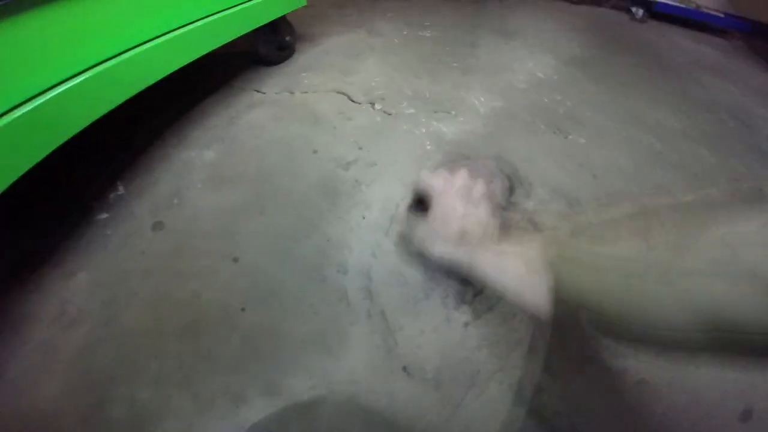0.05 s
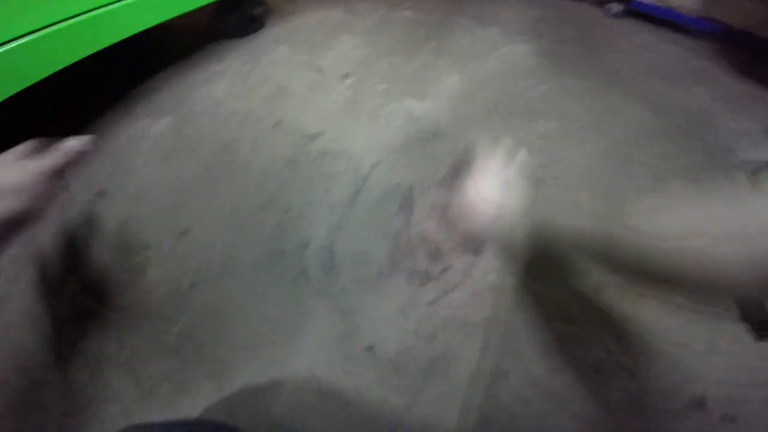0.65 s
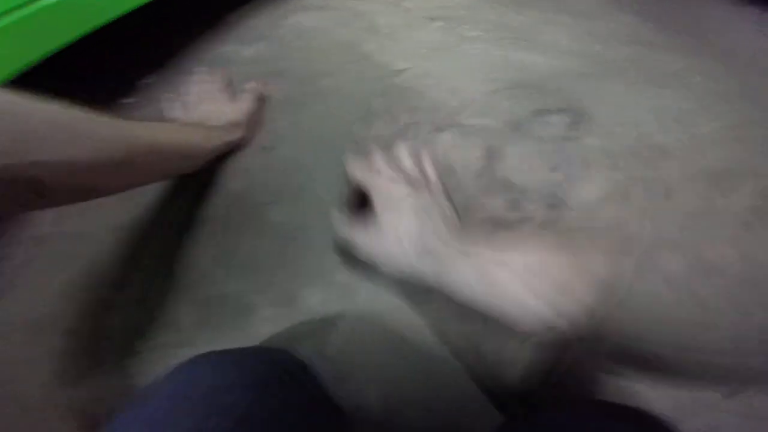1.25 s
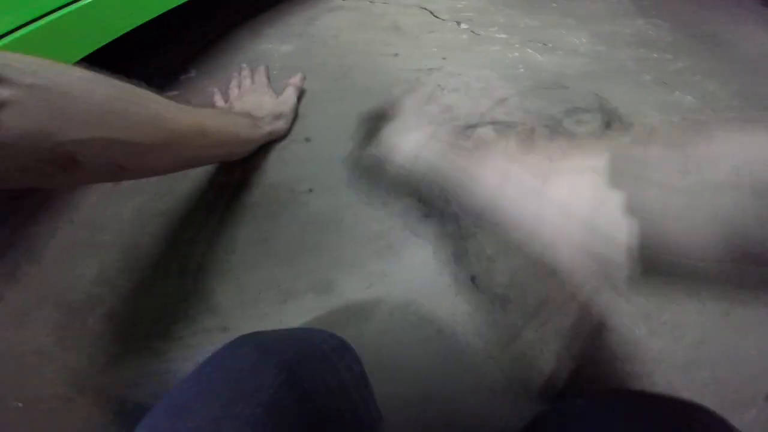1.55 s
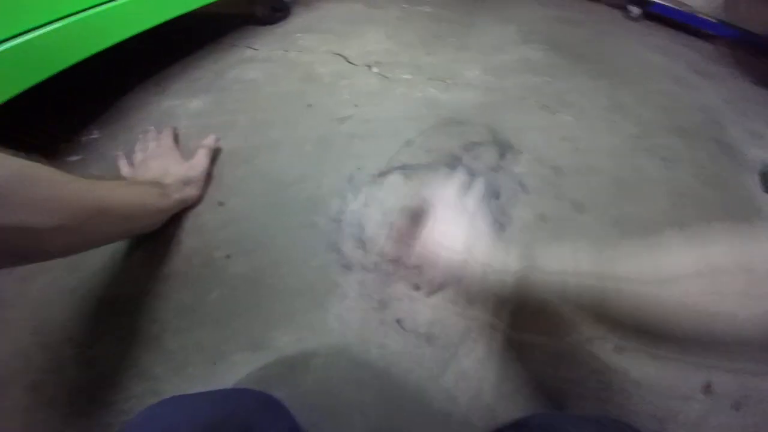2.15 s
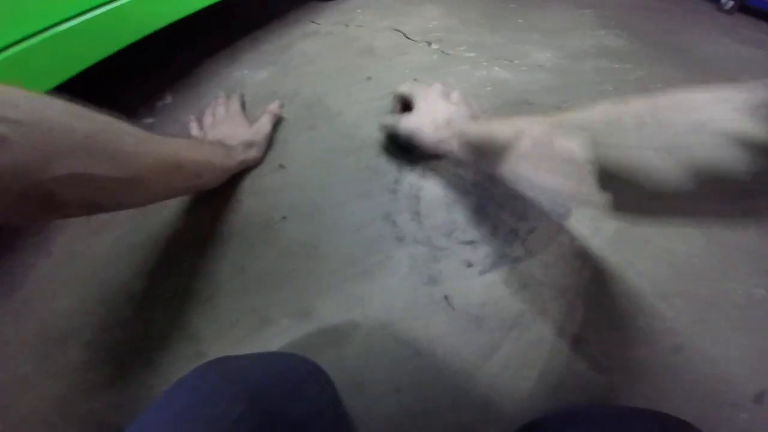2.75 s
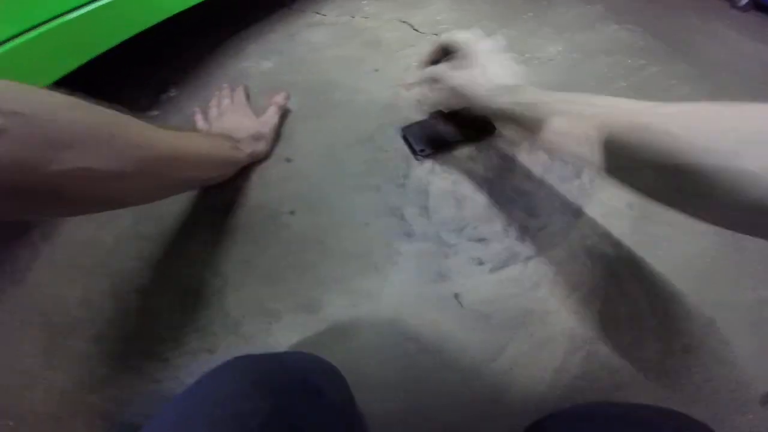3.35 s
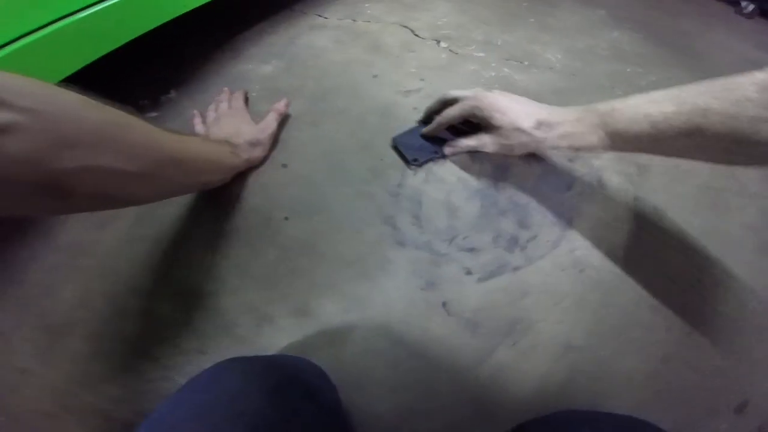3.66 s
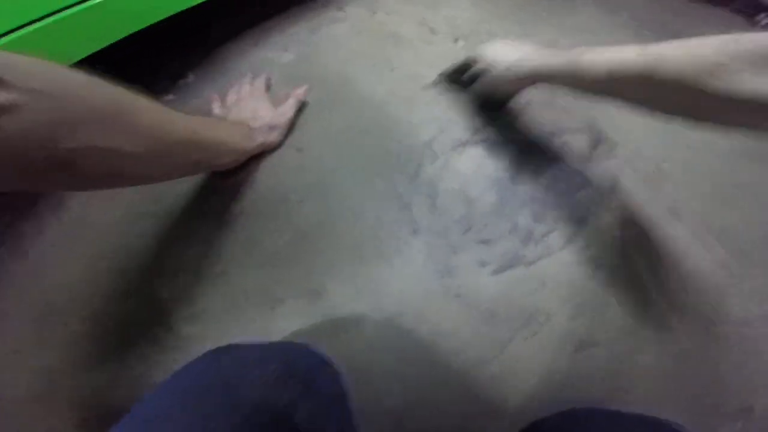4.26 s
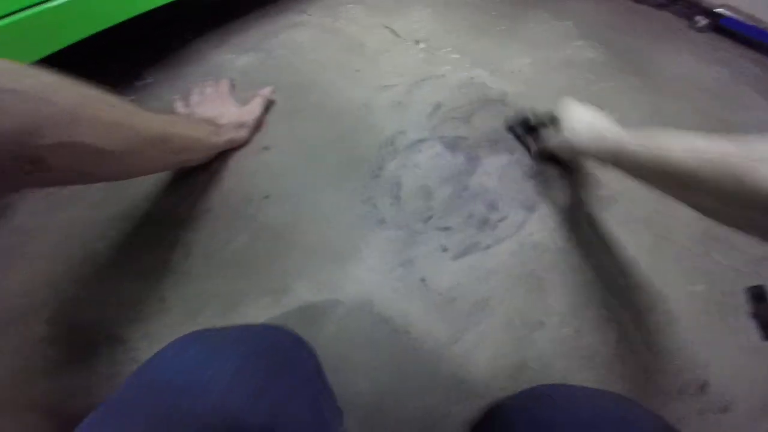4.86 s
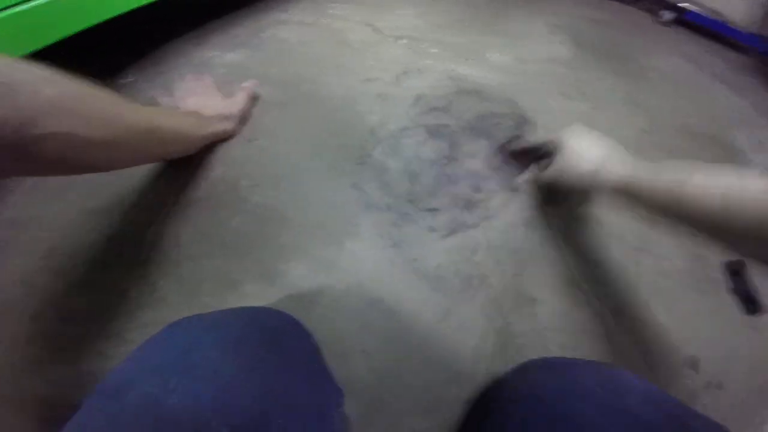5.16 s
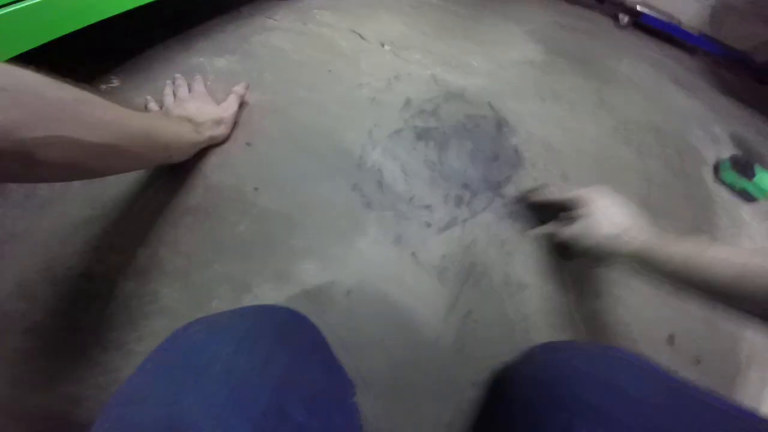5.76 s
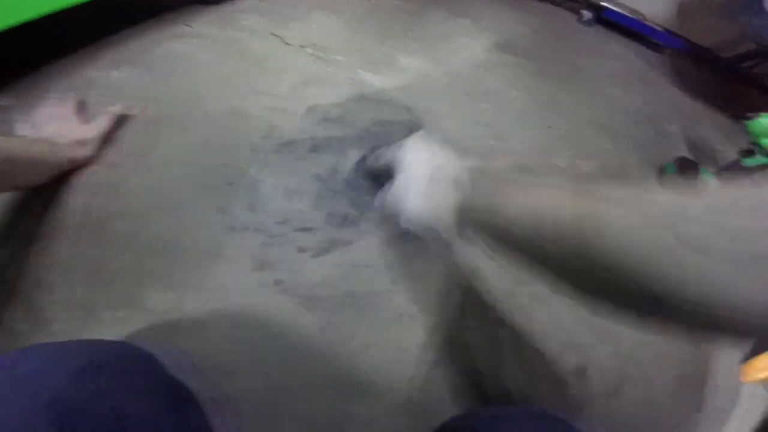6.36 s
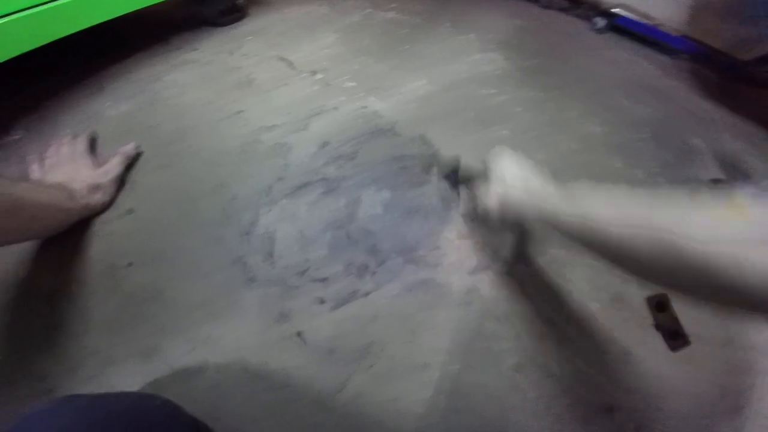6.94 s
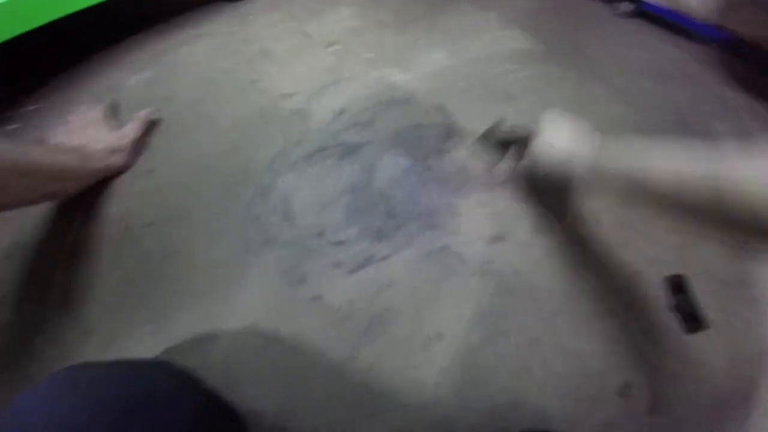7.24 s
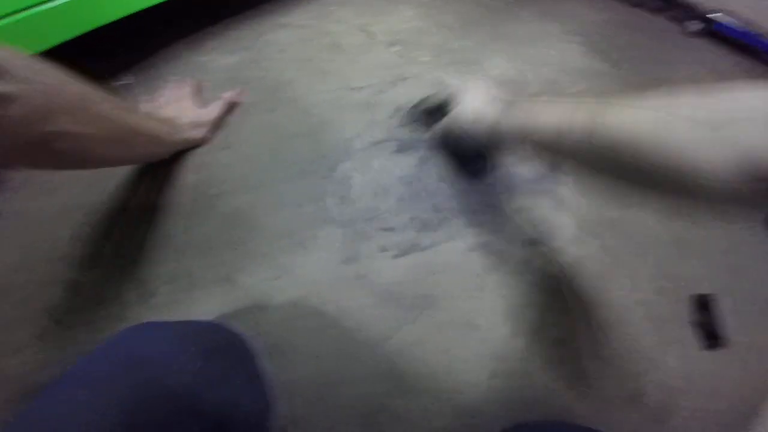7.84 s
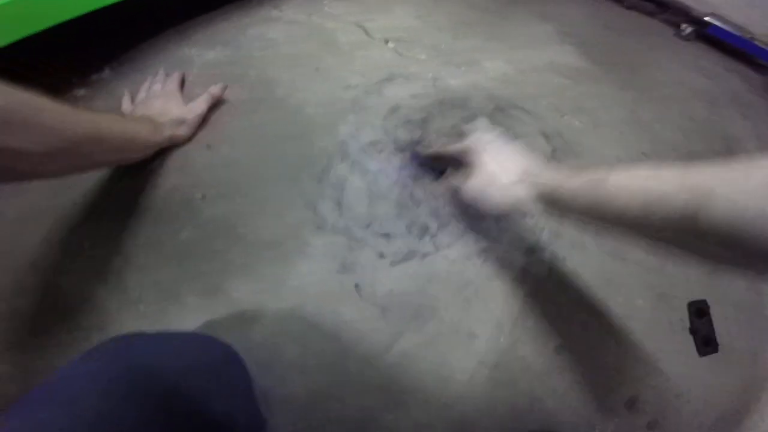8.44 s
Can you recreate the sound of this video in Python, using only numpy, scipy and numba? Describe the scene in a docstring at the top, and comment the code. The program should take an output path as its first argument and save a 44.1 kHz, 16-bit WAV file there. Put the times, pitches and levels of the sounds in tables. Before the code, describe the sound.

Three plastic clicks snap right at the microphone, the second very loud. A brake pad is then scrubbed in quick circles on a concrete garage floor, each stroke a gritty rasp with a short, rough metallic squeal. It stops with a light knock, is turned over, and starts again on its edge, brighter and squeakier. The sound is close, with a faint ring from the room.

```python
"""A brake pad scrubbed in circles on a concrete garage floor: on its face, then, turned over, on its edge.
With each push and pull of the arm, sand grains rasp under it and set its steel backing plate ringing in
short, rough squeals. The microphone sits in a worn camera whose plastic case clicks three times at the
start, right up close, ducking the gain control. The camera sways with the arm; the garage rings faintly."""
import sys
import numpy as np
from scipy import signal
from scipy.fft import rfft, irfft, next_fast_len
from scipy.io import wavfile
from scipy.ndimage import uniform_filter1d, minimum_filter1d, map_coordinates
from numba import njit

SR = 44100
rng = np.random.default_rng(int(sys.argv[2]) if len(sys.argv) > 2 else 0)


def transcribe(signal):
    """Save signal, clipped to [-1, 1], as a 16-bit WAV file at the path in sys.argv[1]."""
    frames = np.atleast_2d(signal).T
    limited = np.clip(frames, -1, 1)
    pcm = np.round(limited * 32767).astype(np.int16)
    wavfile.write(sys.argv[1], SR, pcm)


N = 383669

# bending modes of the steel plate: pitch_hz, width_hz, on_face_db, on_edge_db
BENDING_MODES = [(2460, 91, -1, 12), (2770, 57, -12, -35), (3223, 85, -12, 1)]


def scrape():
    """Grains strike the pad: a rasp, the squeal of the bending plate, a sizzle of high modes and dust."""
    # the grip shifts the first bending mode: time_s, pitch_hz
    grip = [(0.4, 2390), (0.68, 2540), (0.91, 2500), (1.85, 2514), (2.62, 2367), (3.24, 2450), (3.61, 2356),
            (6.66, 2554), (7.54, 2485), (7.68, 2530), (8.4, 2400), (8.7, 2460)]
    # high modes of the plate: pitch_hz, width_hz, on_face_db, on_edge_db
    high_modes = [(5930, 200, 0, -6), (6230, 170, -1, 0), (8420, 160, -12, -3), (9300, 200, -7, -.5),
                  (9940, 190, -4, 2), (11450, 190, -12, -15), (13500, 180, -28, -22),
                  (14750, 500, -38, -27)]
    # spectrum of fine dust: frequency_hz, level_db
    dust_spectrum = [(1500, -30), (3500, -2.5), (5000, 0.5), (7200, -2.5), (11000, -9), (12500, -27),
                     (15000, -34)]
    grip_hz, = curves(grip)
    on_edge, = curves([(3.98, 0), (4.1, 1)])
    rasp_db, squeal_db, sizzle_db, contact_hz, catch_db, ease_db = arm(on_edge)
    judder = amp(1.05 * wobble(55) + 0.14 * wobble(220))  # the pad skips over the rough floor
    force = judder * grit(per_s=9000, spread_db=-2)
    rasp = sand_rasp(force, judder, contact_hz, on_edge)
    lock_db = 0.42 * catch_db * on_edge  # on the edge, a hard squeal lets the first mode take over
    squeal = plate(force, BENDING_MODES, on_edge, flutter_db=-0.5, swap_db=4, tremble_hz=52.6,
                   drift_hz=34.6, skirt=0.21, favoured=0, favour_db=lock_db,
                   bend=grip_hz / BENDING_MODES[0][0])
    corner_db = 5.5 * swell(middle_s=6.62, length_s=2.2)  # tipped onto a corner
    sizzle = plate(force, high_modes, on_edge, flutter_db=2, swap_db=3.5, tremble_hz=45,
                   drift_hz=50, skirt=0.13, favoured=2, favour_db=corner_db)
    dust = coloured(judder * grit(per_s=6000, spread_db=2), dust_spectrum)
    dust *= amp(-10.5 - 2 * on_edge + 0.3 * ease_db)  # a light hand crushes less dust
    return amp(rasp_db) * rasp + amp(squeal_db) * squeal + amp(sizzle_db) * (sizzle + dust)


def arm(on_edge):
    """Pressure sets the drag; each stroke adds sizzle, rasp and squeal and moves the contact resonance."""
    # the hand bears down, easing off for the turn: time_s, drag_db
    pressure = [(0.0, -46.5), (0.28, -34.5), (0.84, -37.5), (1.45, -37), (2.21, -37.5), (2.41, -37.5),
                (2.85, -38), (3.03, -31), (3.24, -36), (3.34, -41.5), (3.57, -61), (3.93, -65.5),
                (3.96, -44), (4.32, -30.5), (5.12, -36.5), (6.07, -36), (7.37, -34.5), (8.7, -35.0)]
    # pushes and pulls of the arm: middle_s, length_s, push_db, catch_db, full_speed_hz
    strokes = [(0.02, 0.2, 12.5, 14.5, 1270.0), (0.596, 0.15, 10, 9.5, 1240), (0.74, 0.23, 17, 12.0, 1460),
               (0.931, 0.41, 13.5, 14.5, 1770), (1.21, 0.32, 16.5, 13.5, 1630),
               (1.323, 0.19, 12.5, 14.5, 1500.0), (1.456, 0.33, 19.5, 11, 1455),
               (1.636, 0.33, 18.5, 16, 1890), (1.807, 0.27, 13.5, 14.5, 1550), (1.945, 0.38, 13, 8.5, 1460),
               (2.108, 0.23, 10.5, 7.5, 1270), (2.26, 0.37, 17.5, 12.5, 1410),
               (2.469, 0.26, 11, 13.5, 1390), (2.63, 0.083, 7, 5, 1350), (2.724, 0.38, 12.5, 9.0, 1610),
               (2.905, 0.21, 6, 11, 1610), (3.066, 0.29, 10, -1, 1660), (3.211, 0.16, 11.5, 9.5, 1240),
               (3.697, 0.1, 19, 9, 890.0), (3.762, 0.09, 28, 23, 910), (4.109, 0.32, 7, 7.5, 1240),
               (4.286, 0.35, -3.5, -2, 1900), (4.37, 0.2, 4, 1, 1660), (4.48, 0.18, 0, 4, 1620),
               (4.6, 0.36, 0, 0.5, 1750), (4.706, 0.18, 10.0, 6, 1460.0), (4.884, 0.3, 8, 9.5, 1360),
               (5.059, 0.22, 12.5, 10, 1560), (5.228, 0.3, 8.5, 10.5, 1250), (5.394, 0.21, 10.5, 10, 1705),
               (5.54, 0.21, 9.5, 4.5, 1180), (5.65, 0.39, 2.5, 7.5, 1100), (5.833, 0.34, 5.5, 7, 1280),
               (5.925, 0.104, -3, 1.0, 1550), (6.046, 0.6, 5, 11.5, 1050), (6.23, 0.14, 1.5, 8.5, 1340),
               (6.317, 0.21, 7.0, 1, 1130.0), (6.425, 0.14, 10, 0, 960), (6.58, 0.082, 5.5, -1.5, 1510.0),
               (6.66, 0.16, 5, 9.5, 970), (6.805, 0.24, 7.0, 5.5, 1310), (6.991, 0.24, 6.5, 5, 1090),
               (7.127, 0.17, 4.5, 1, 1040), (7.337, 0.23, 10.0, 5.5, 1180), (7.503, 0.2, 10, 2.0, 1450),
               (7.721, 0.18, 6.5, 4.5, 1110), (7.92, 0.36, 7.5, 1.5, 1170), (8.136, 0.34, 6.5, 3.5, 990),
               (8.336, 0.35, 9.5, 6.5, 945), (8.493, 0.25, 3.5, 6, 995), (8.667, 0.078, 1, 2, 860)]
    # the pad nearly stops as the arm reverses: middle_s, length_s, drop_db
    stalls = [(4.216, .1, 3), (4.96, 0.17, 6), (6.143, 0.097, 4.5), (6.523, .1, 1), (6.717, 0.13, 11.5),
              (6.904, 0.12, 14)]
    # the rim touches down and bites: start_s, boost_db, fade_s
    bites = [(3.673, 13, 0.015), (3.945, 9, 0.056), (4.983, 9, 0.014), (6.927, 1, 0.013)]
    rest_hz, seated_db, lifted_db = 1130.0, -37, -61
    pressure_db, = curves(pressure)
    push_db, catch_db, contact_hz = np.zeros(N), np.zeros(N), np.full(N, rest_hz)
    for middle_s, length_s, stroke_push_db, stroke_catch_db, full_speed_hz in strokes:
        speed = swell(middle_s, length_s)
        push_db += stroke_push_db * speed
        catch_db += stroke_catch_db * speed
        contact_hz += (full_speed_hz - rest_hz) * speed
    stall_db = sum(drop_db * swell(middle_s, length_s) for middle_s, length_s, drop_db in stalls)
    bite_db, t = np.zeros(N), np.arange(SR // 2) / SR
    for start_s, boost_db, fade_s in bites:
        add(bite_db, start_s, boost_db * (1 - np.exp(-t / 0.002)) * np.exp(-t / fade_s))
    ease_db = np.clip(pressure_db, lifted_db, seated_db) - seated_db
    contact_hz *= 2 ** (0.55 * ease_db)  # the resonance sinks under a light hand
    rough_spots_per_s = 22
    rasp_db = pressure_db + 0.25 * (push_db - stall_db) + 1.95 * wobble(rough_spots_per_s)
    squeal_db = pressure_db + np.interp(on_edge, [0, 1], [-7.5, -1.57])
    squeal_db += catch_db - 0.34 * stall_db + bite_db + 2.15 * wobble(rough_spots_per_s)
    sizzle_db = pressure_db + np.interp(on_edge, [0, 1], [-15.6, -5.5])
    sizzle_db += push_db - stall_db + bite_db + wobble(rough_spots_per_s)
    return rasp_db, squeal_db, sizzle_db, contact_hz, catch_db, ease_db


def sand_rasp(force, judder, contact_hz, on_edge):
    """Sand crunches under the pad and excites the contact resonance and the hollow of the hand."""
    # spectrum of crushed sand: frequency_hz, level_db
    sand_spectrum = [(40, -20), (130, -10), (330, -12.5), (540, -17.5), (750, -1), (1150, 2.5), (1900, -4),
                     (2800, -2.5), (3800, -9), (5000, -26.5)]
    contact = resonate(force, contact_hz + 70 * wobble(30), width_hz=178.0)
    contact = unit(band(contact, 586, 3360, order=3))
    hollow = resonate(force, 560 + 60 * wobble(9), width_hz=118.0)
    hollow = unit(band(hollow, 456, 653)) * amp(4.7 * wobble(12) + 2.64 * on_edge)
    sand = coloured(judder * grit(per_s=4000, spread_db=2.5), sand_spectrum)
    sand = floor_patches(sand, depth_db=4.5, width_hz=202.3, life_s=0.06)
    sand_db = -2.5 - 2 * on_edge  # the flat face crushes more sand than the edge
    return amp(-6.5) * contact + amp(-17) * hollow + amp(sand_db) * sand


def grit(per_s, spread_db):
    """Impulses of grains of different sizes, at rms 1."""
    hits = rng.random(N) < per_s / SR
    return unit(hits * rng.standard_normal(N) * amp(spread_db * rng.standard_normal(N)))


def floor_patches(x, depth_db, width_hz, life_s):
    """Each patch of floor under the pad favours its own pitches."""
    hz, t, spectra = signal.stft(x, SR, nperseg=512)
    where = np.meshgrid(hz / width_hz, t / life_s, indexing="ij")
    patches = map_coordinates(rng.standard_normal((256, 512)), where, mode="wrap")
    return unit(signal.istft(spectra * amp(depth_db * patches), SR, nperseg=512)[1][:N])


def plate(force, modes, on_edge, flutter_db, swap_db, tremble_hz, drift_hz, skirt, favoured, favour_db,
          bend=1):
    """Modes catch in short bursts and take turns, trembling with the contact; their sum is held level."""
    out = np.zeros(N)
    for k, (hz, width_hz, face_db, edge_db) in enumerate(modes):
        side = np.sign(rng.standard_normal(N))  # a grain lands on either side of the nodal line
        drive_db = face_db + on_edge * (edge_db - face_db) + flutter_db * wobble(110) + swap_db * wobble(14)
        if k == favoured:
            drive_db += favour_db
        pitch_hz = hz * bend + tremble_hz * wobble(90) + drift_hz * wobble(13)
        mode = resonate(side * force * amp(drive_db), pitch_hz, width_hz)
        out += band(mode, hz / (1 + skirt), hz * (1 + skirt), order=2)
    return out / np.sqrt(running_power(out, SR // 12))


def squeaks():
    """Stick-slip locks onto one mode for a moment; the tone swells, wavers and lets go."""
    # the pad's edge catches: start_s, level_db, pitch_hz, length_s
    catches = [(1.335, -21, 2540, 0.021), (1.793, -19, 2520, 0.016), (4.48, -17.5, 2560, 0.0093),
               (4.528, -15, 2440, 0.012), (4.7, -29, 3410, 0.043), (5.028, -23.5, 3320, 0.014),
               (5.084, -16.5, 2550, 0.0081), (5.191, -24, 3050, 0.026), (5.982, -19.5, 2570, 0.019),
               (6.062, -21, 2520, 0.014), (6.204, -20.5, 2492, 0.027), (6.57, -27.5, 1430, 0.052),
               (7.332, -16.5, 2400, 0.036), (7.53, -38, 1440, 0.029)]
    out, t = np.zeros(N), np.arange(SR // 10) / SR
    for start_s, level_db, pitch_hz, length_s in catches:
        wavering_hz = pitch_hz + 85 * wobble(226)[:len(t)]
        tone = np.sin(2 * np.pi * np.cumsum(wavering_hz) / SR)
        envelope = np.exp(-2.3 * (2 * t / length_s - 1.2) ** 2)
        add(out, start_s, amp(level_db + 1.8 * wobble(320)[:len(t)]) * envelope * tone)
    return out


def knocks():
    """The pad tips and lands: a dull crack, a thud in the slab and a brief ring of the plate."""
    # landings on the concrete: start_s, crack_db, thud_db, thud_hz, ring_db
    landings = [(2.196, -24.5, -60, 600, -38), (2.449, -39, -29, 195, -42), (3.325, -20.5, -32.5, 497, -25),
                (4.716, -47, -26.5, 445, -40), (8.34, -38, -21, 560, -21)]
    out, t = np.zeros(N), np.arange(SR // 8) / SR
    steel = ring([(hz, face_db, 0.07) for hz, _, face_db, _ in BENDING_MODES], t)
    for start_s, crack_db, thud_db, thud_hz, ring_db in landings:
        crack = band_noise(t, 520, 1740) * np.exp(-t / 0.0049)
        thud = band_noise(t, thud_hz * 0.5, thud_hz * 1.4) * np.exp(-t / 0.015)
        add(out, start_s, amp(crack_db) * crack + amp(thud_db) * thud + amp(ring_db) * steel)
    return out


def fingers():
    """Dusty skin slides over the lifted pad."""
    # the fingers turn the pad over: time_s, level_db
    turn = [(3.3, -72), (3.36, -40.5), (3.54, -50.5), (3.59, -87)]
    # spectrum of sliding skin: frequency_hz, level_db
    skin_spectrum = [(100, -12), (500, 1.5), (1500, -11.5), (4000, -21.5), (7000, -22), (11000, -29),
                     (15000, -42)]
    turn_db, = curves(turn)
    return amp(turn_db) * coloured(grit(per_s=6000, spread_db=1), skin_spectrum)


def camera_case():
    """Plastic snaps right by the microphone; the hollow case swells and dies within a few cycles."""
    # clicks of the case: start_s, snap_db, snap_hz, tick_hz, tick_db, body_db, latch_db
    clicks = [(0.1089, -1, 3630, 2700, 6.5, 0, -29), (0.2339, 14.5, 4770, 1580, 10, 16.5, -7),
              (0.328, -14, 3560, 1840, -11, 2, -48)]
    # modes of the hollow case: pitch_hz, level_db, t60_s
    case_modes = [(166, -6, 0.0095), (376, -0.5, 0.0038), (825, 3.5, 0.02)]
    # modes of the latch: pitch_hz, level_db, t60_s
    latch_modes = [(910, -9, .056), (1820, 0, .095), (2853, -24, .11), (4177, -18, .047)]
    out, t = np.zeros(N), np.arange(SR // 6) / SR
    rise = t / 0.00058
    pulse = rise * np.exp(1 - rise)
    body = ring(case_modes, t) * (1 - np.exp(-(t / 0.0012) ** 2))
    latch = ring(latch_modes, t)
    for start_s, snap_db, snap_hz, tick_hz, tick_db, body_db, latch_db in clicks:
        snap = amp(snap_db) * band_noise(t, snap_hz * 0.24, snap_hz * 1.45)
        tick = amp(tick_db) * np.sin(2 * np.pi * tick_hz * t)
        add(out, start_s, pulse * (snap + tick) + amp(body_db) * body + amp(latch_db) * latch)
    return out


def camera_sway():
    """Soft, low pushes at the microphone as the camera sways with the arm."""
    # the arm jostles the camera: start_s, level_db, pitch_hz
    jostles = [(1.10, -35, 29.1), (1.47, -27, 35), (3.05, -32, 29.8), (4.19, -32, 30), (5.24, -44.5, 28),
               (6.041, -29.5, 62.3), (7.70, -34, 30.5), (8.54, -31, 30.3)]
    out, t = np.zeros(N), np.arange(SR // 3) / SR
    for start_s, level_db, pitch_hz in jostles:
        cycles = t * pitch_hz
        envelope = cycles * np.exp(1 - cycles / 0.6)
        add(out, start_s, amp(level_db) * envelope * np.sin(2 * np.pi * cycles))
    return out


def garage(x):
    """The room answers about 7 ms late, each frequency dying at its own speed."""
    # reverberation of the garage: frequency_hz, t60_s
    decay_times = [(100, 1), (500, 0.28), (2500, 0.17), (7000, 0.57), (14000, 0.25)]
    hz, t, spectra = signal.stft(rng.standard_normal(SR), SR, nperseg=256)
    decay = amp(-60 * t / along(decay_times, hz)[:, None])
    tail = signal.istft(spectra * decay, SR, nperseg=256)[1]
    delayed = np.pad(x, (SR // 150, 0))
    return signal.fftconvolve(delayed, tail / np.linalg.norm(tail))[:N]


def room_tone():
    """The low hush of still air in the garage."""
    # spectrum of the hush: frequency_hz, level_db
    hush_spectrum = [(25, -1), (42, -1.5), (58, 2), (80, -8.5), (200, -11), (500, -7), (1000, -18.5),
                     (3000, -29.5), (9000, -37.5), (15000, -61)]
    return coloured(rng.standard_normal(N), hush_spectrum)


def gain_control(x, ceiling_db, release_db_per_s):
    """A loud peak ducks the gain at once; it then creeps back."""
    level_db = 10 * np.log10(running_power(x, SR // 700))
    needed_db = minimum_filter1d(np.minimum(ceiling_db - level_db, 0), SR // 150)
    recovery_db = release_db_per_s * np.arange(N) / SR
    return x * amp(np.minimum.accumulate(needed_db - recovery_db) + recovery_db)


def amp(db):
    """Decibels to gain."""
    return 10 ** (np.asarray(db) / 20)


def unit(x):
    """x at rms 1."""
    return x / np.sqrt(np.mean(x ** 2) + 1e-20)


def running_power(x, samples):
    """Mean square over a sliding window."""
    return np.abs(uniform_filter1d(x ** 2, samples)) + 1e-12


def along(points, hz):
    """Interpolate (frequency_hz, value) points on a log frequency axis."""
    knots_hz, values = np.transpose(points)
    return np.interp(np.log(hz + 1), np.log(knots_hz + 1), values)


def curves(rows):
    """One value per sample for each column after the time."""
    time_s, *columns = np.transpose(rows)
    return [np.interp(np.arange(N) / SR, time_s, column) for column in columns]


def swell(middle_s, length_s):
    """One movement: from 0 smoothly up to 1 and back."""
    phase = (np.arange(N) / SR - middle_s) / length_s
    return np.where(np.abs(phase) < 0.5, np.cos(np.pi * phase) ** 2, 0)


def wobble(knots_per_s):
    """A smooth random curve."""
    steps = np.arange(0, N, 16)
    coarse = map_coordinates(rng.standard_normal(8192), [steps * knots_per_s / SR], mode="wrap")
    return np.interp(np.arange(N), steps, coarse)


def filtered(x, response):
    """x through a gain given as a function of frequency."""
    size = next_fast_len(N + SR // 2)
    return irfft(rfft(x, size) * response(np.fft.rfftfreq(size, 1 / SR)), size)[:N]


def coloured(x, spectrum):
    """x shaped by a (frequency_hz, level_db) spectrum, at rms 1."""
    return unit(filtered(x, lambda hz: amp(along(spectrum, hz))))


@njit
def resonate(x, hz, width_hz):
    """A resonance of unit peak gain whose frequency moves sample by sample."""
    y, state, decay = np.zeros(len(x)), 0j, np.exp(-np.pi * width_hz / SR)
    for i in range(len(x)):
        state = state * decay * np.exp(2j * np.pi * hz[i] / SR) + x[i]
        y[i] = (1 - decay) * (2 * state.real - x[i])
    return y


def band(x, lo_hz, hi_hz, order=1):
    """A causal band-pass."""
    sos = signal.butter(order, [lo_hz, min(hi_hz, SR / 2 - 500)], "band", fs=SR, output="sos")
    return signal.sosfilt(sos, x)


def band_noise(t, lo_hz, hi_hz):
    """A band of noise as long as t, at rms 1."""
    return unit(band(rng.standard_normal(len(t)), lo_hz, hi_hz, order=2))


def ring(modes, t):
    """Damped sines; neighbouring modes swing in opposite directions."""
    return sum((-1) ** k * amp(level_db - 60 * t / t60_s) * np.sin(2 * np.pi * hz * t)
               for k, (hz, level_db, t60_s) in enumerate(modes))


def add(track, start_s, sound):
    """Mix a sound into the track."""
    part = track[round(start_s * SR):][:len(sound)]
    part += sound[:len(part)]


def scene():
    """At the microphone, in mono: the pad in the garage, the camera's own noises and the still air."""
    pad = scrape() + squeaks() + knocks() + fingers()
    air = amp(-49) * room_tone()
    return (pad + amp(-11) * garage(pad) + camera_case() + camera_sway() + air)[None]


def record(dry):
    """The camera ducks after loud peaks, rounds them off at full scale and cuts the top treble."""
    top_hz = 15300
    held = gain_control(dry[0], ceiling_db=-4, release_db_per_s=20)
    rounded = held / (1 + np.abs(held) ** 6) ** (1 / 6)
    return filtered(rounded, lambda hz: 1 / (1 + (hz / top_hz) ** 160))[None]


dry = scene()
out = record(dry)
transcribe(out)
```